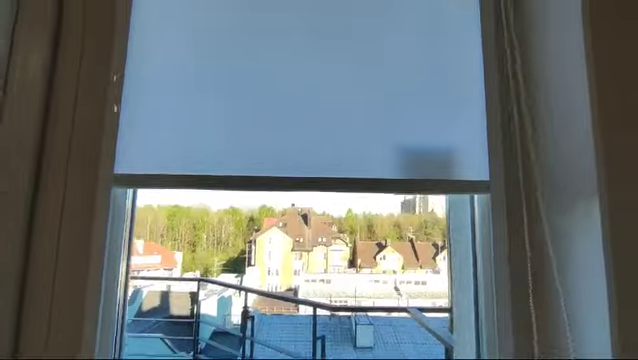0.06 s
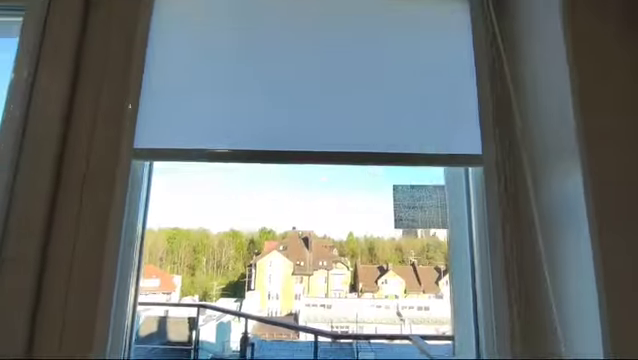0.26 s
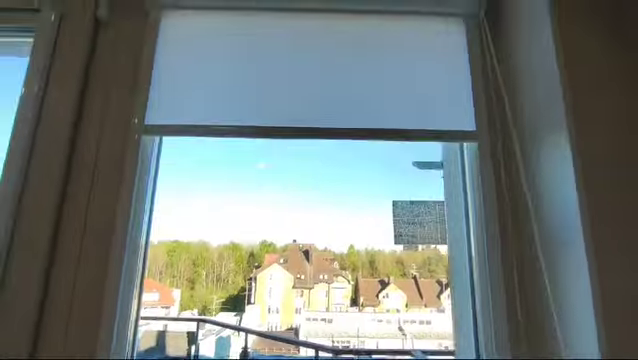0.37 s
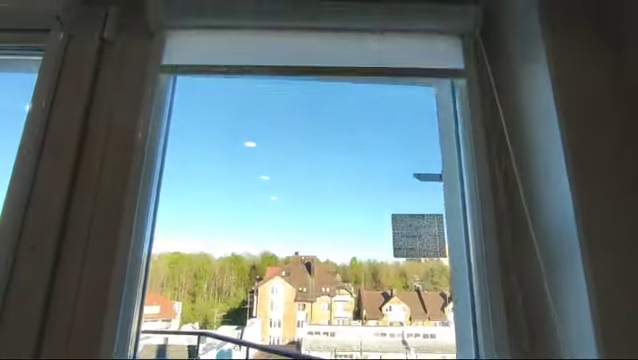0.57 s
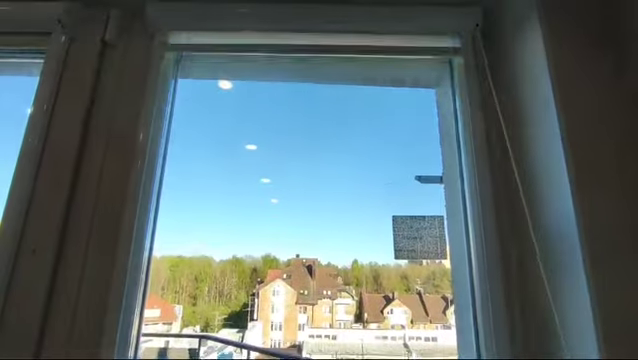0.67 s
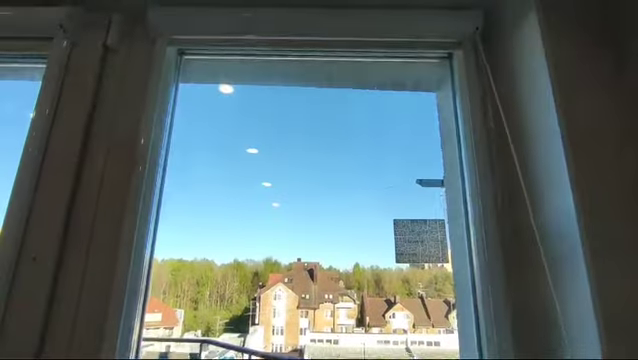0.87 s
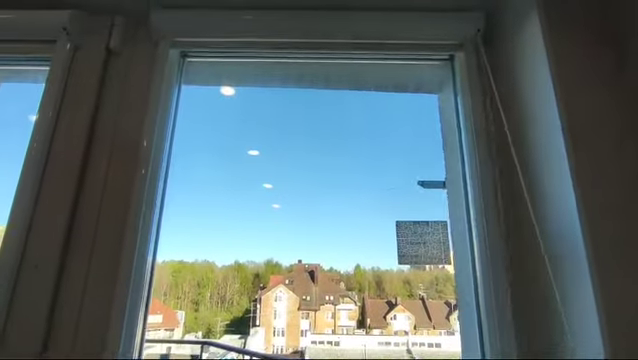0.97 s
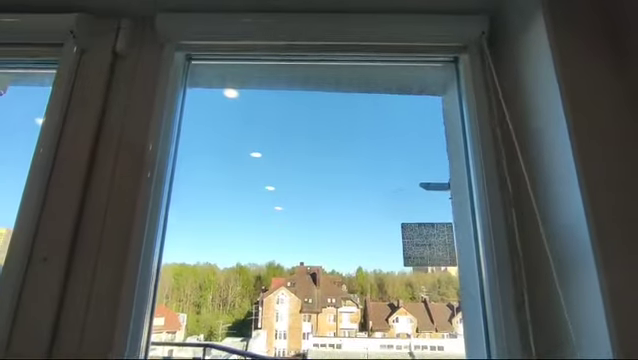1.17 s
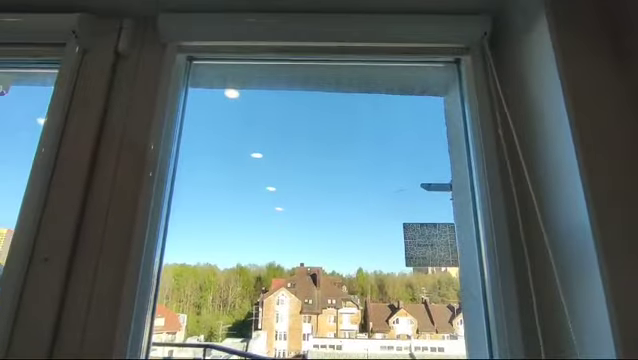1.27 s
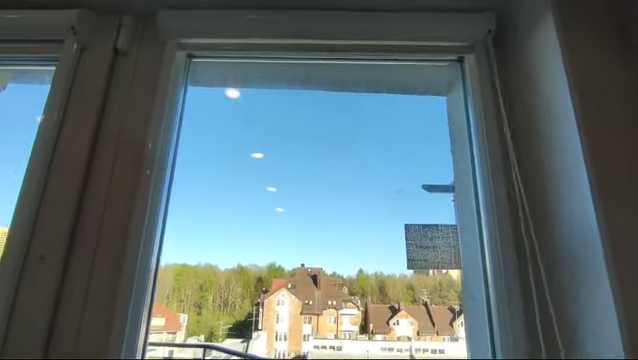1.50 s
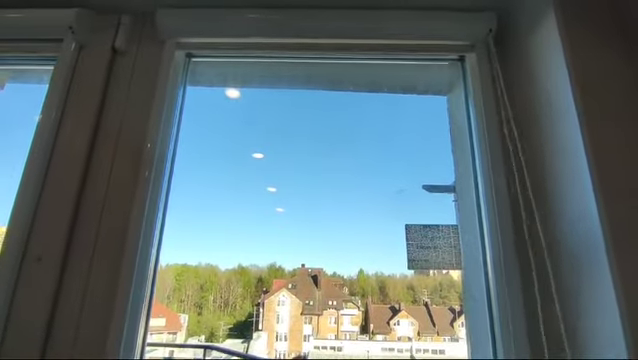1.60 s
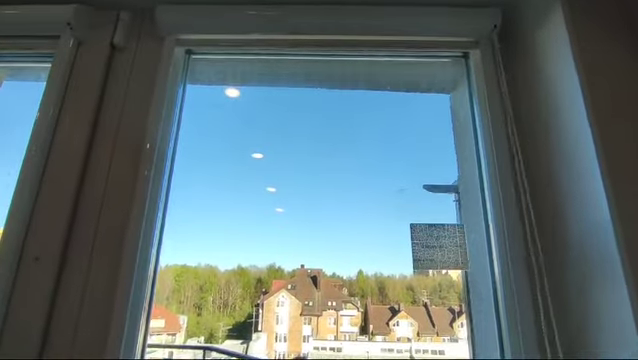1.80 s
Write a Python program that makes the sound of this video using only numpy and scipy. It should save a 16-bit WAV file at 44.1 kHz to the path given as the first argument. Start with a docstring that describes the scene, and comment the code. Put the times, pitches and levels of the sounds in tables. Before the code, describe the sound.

A spring roller blind whirs and ticks rapidly upward, then knocks hard at the top

```python
"""A small, hard-walled room, close to a window; a stereo pair with its right port nearer the window.
A spring roller blind is let go: slips in its bearings make a whirr, sprung ticks and a thin whine join in,
then it slows and the bottom bar knocks the top and rings the frame. A soft rustle and a light cord tap follow.
Most sources are shaped noise, with sines for whine and rings. The left port is dull: treble sits on the right."""
import sys
import numpy as np
from scipy import signal
from scipy.fft import rfft, irfft, next_fast_len
from scipy.io import wavfile
from scipy.ndimage import map_coordinates

SR = 44100
rng = np.random.default_rng(int(sys.argv[2]) if len(sys.argv) > 2 else 0)


def wav_record(signal):
    """Record a signal, one row per channel, as 16-bit PCM in the file named by sys.argv[1]."""
    frames = np.transpose(np.atleast_2d(signal))
    bounded = np.clip(frames, -1, 1)
    # unit amplitude maps onto the largest positive 16-bit level
    quanta = np.round(bounded * 32767).astype(np.int16)
    wavfile.write(sys.argv[1], SR, quanta)


N = 81585  # samples

# Source levels are relative, ahead of the room and the ports; colours are relative too.
# the quiet room's rumble and its air: pitch_hz, level_db
RUMBLE_COLOUR = [(12, -30), (20, 8.5), (66, -7), (97, -16.5), (130, -14), (170, -49), (290, -120),
                 (300, -44), (800, -50.5)]
AIR_COLOUR = [(100, 8.5), (300, 1), (1000, -12), (3000, -13), (8000, -39), (15000, -24.5)]
RUMBLE_DB, AIR_DB = -45.5, -55

# the roller's rubbing: time_s, level_db
RUB_LEVEL = [(0, -65), (.03, -51), (.15, -47), (.21, -47), (.29, -37.5), (.34, -32.5), (.5, -32.5),
             (.58, -33.5), (.66, -36), (.73, -46), (.81, -58)]
# the roller's speed, as the pitch of its whine: time_s, pitch_hz
ROLLER_SPEED = [(0, 300), (.2, 800), (.3, 1030), (.37, 1170), (.46, 1390), (.5, 1340), (.57, 1290),
                (.64, 1150), (.72, 1030), (.81, 900)]
# colour of the rubbing: pitch_hz, level_db
RUB_COLOUR = [(88, -93), (150, -20.5), (209, -21), (481, -24), (656, -5), (930, -10), (1000, -3.5),
              (1290, -5.5), (1700, -3), (2180, -3.5), (2360, -6.5), (6110, -19), (8330, -11.5),
              (10300, -24), (15500, -29.5)]
# resonances of the roller tube: pitch_hz, width_hz, level_db
TUBE_MODES = [(660, 60, -12), (1024, 15, -9), (1546, 18, 0), (1835, 60, -7), (2040, 50, -6), (2120, 22, 0),
              (2540, 110, -7), (3080, 120, -11), (4980, 300, -20)]
STOP_S = 0.74  # the rubbing is cut off here
FULL_SPEED_HZ, SLIPS_PER_S = 1252, 9000  # whine pitch at which the slips come this often
SLIP_SPREAD_DB, RUB_FLUTTER_DB = 2, 2.6
RUB_DB, TUBE_DB = 1, -7

# ticks of the spring mechanism: peak_s, level_db
SPRING_TICKS = [(.016, -48), (.0245, -40), (.059, -51), (.1005, -36), (.148, -36.5), (.182, -29),
                (.2075, -21), (.227, -25.5), (.2455, -23.5), (.261, -30), (.278, -23), (.289, -33),
                (.36, -30), (.374, -30), (.396, -27), (.464, -30)]
# colour of a tick: pitch_hz, level_db
TICK_COLOUR = [(150, -25), (360, -11), (480, -20), (650, -9), (950, -16), (1550, -3), (1800, -5), (2120, 0),
               (2650, -2), (3100, -8), (3800, -20), (5000, -13), (6600, -22), (8400, -16), (10500, -26),
               (15000, -30)]
TICK_RISE_S, TICK_FALL_S = 0.0026, 0.0032
TICK_RING_HZ, TICK_RING_DB = 2125, -1

# clicks of small plastic parts: start_s, level_db, t60_s, ring_db (ring against click)
PLASTIC_CLICKS = [(.0825, -48, 0.015, -20), (.308, -25, 0.084, 1.5), (0.32, -32, 0.054, -10),
                  (.522, -23, 0.013, -16), (0.8803, -31, 0.05, -17), (0.884, -34.5, 0.13, -10),
                  (1.158, -58, 0.021, -9), (1.245, -55, 0.023, -12)]
# colours of the click and of its thin ring: pitch_hz, level_db
CLICK_COLOUR = [(1500, -7), (5500, -9), (6800, -3), (8400, 3), (9500, -4.5), (11500, -11.5), (15500, -12)]
CLICK_RING_COLOUR = [(6000, -49), (7600, -14), (7920, 1), (8300, -20), (10000, -48)]

# swells of the whine as the roll turns: peak_s, length_s, level_db
WHINE_SWELLS = [(.36, .033, -38), (.5, .017, -28.5), (.572, .015, -30.5), (.638, .011, -29.5),
                (.695, .02, -43)]
WHINE_ROUGH = 0.012  # wander, as a share of its pitch

# drone of the nearly full roll: time_s, level_db
DRONE_LEVEL = [(.4, -60), (.62, -54.5), (.74, -46.5), (.81, -49.5), (.84, -97)]
# colour of the drone: pitch_hz, level_db
DRONE_BODY = [(100, -42), (185, -16), (214, -0.5), (250, -10.5), (330, -23), (420, -12), (550, -7),
              (900, -31), (3000, -73)]

# colour of the scrape in the hollow squawk: pitch_hz, level_db
SCRAPE_COLOUR = [(300, -56), (620, -6), (800, -3), (1030, -1.5), (1250, 3.5), (1700, -20.5), (5000, -48)]
SQUAWK_S, SQUAWK_LENGTH_S = 0.4415, 0.0045
SQUAWK_HZ, SQUAWK_HZ_PER_S = 1020, 25000  # pitch at the peak, and its upward slide
SQUAWK_DB, SCRAPE_DB = -20, -5  # the scrape is against the tone

# contacts of the bar at the top: start_s, level_db, t60_s
BAR_KNOCKS = [(.8085, -24, 0.12), (.813, -24.5, 0.084), (.8155, -16.5, 0.072), (.832, -46, 0.17),
              (.875, -24, .08)]
# colour of a contact: pitch_hz, level_db
KNOCK_COLOUR = [(80, -27), (140, -13), (200, 1), (380, -2), (540, 4.5), (800, 1), (1300, 1), (2000, 2),
                (2400, -5), (2800, -3.5), (3800, -13.5), (6000, -19.5), (8400, -15.5), (10500, -26),
                (15500, -29)]
# modes of the struck frame: pitch_hz, level_db, t60_s
FRAME_MODES = [(221, -39, 0.21), (481, -36.5, 0.32), (528, -38.5, 0.54), (606, -41, 0.19),
               (775, -35.5, 0.13), (1056, -45, 0.48), (1150, -43.5, 0.87), (1247, -43, 0.13),
               (1492, -32, 0.23), (1900, -31, 0.29), (1923, -42.5, 0.28), (2782, -24.5, 0.042)]
FRAME_S, FRAME_DB = 0.8135, 4.5  # moment of the ring, and lift of all its modes

# dull shuffle, then low and high rustle: time_s, level_db
SHUFFLE_LEVEL = [(1.28, -80), (1.34, -46), (1.43, -49.5), (1.47, -68)]
LOW_RUSTLE_LEVEL = [(1.61, -74), (1.67, -48.5), (1.72, -50), (1.85, -52.5)]
HIGH_RUSTLE_LEVEL = [(1.73, -79), (1.79, -45.5), (1.825, -43.5), (1.85, -45.5)]
# their colours: pitch_hz, level_db
SHUFFLE_BODY = [(40, 10), (120, -0.5), (230, -6.5), (400, -14), (2000, -60)]
LOW_RUSTLE_COLOUR = [(200, -30), (500, -5.5), (1400, -1), (2200, -8), (4000, -14), (8300, -12),
                     (11000, -21.5), (15000, -26.5)]
HIGH_RUSTLE_COLOUR = [(800, -30), (1800, -5.5), (2600, 4.5), (4200, 3), (6000, -1.5), (8300, -1),
                      (10500, -9.5), (15000, -13)]

# light taps of the swinging cord: start_s, level_db, t60_s
CORD_TAPS = [(1.304, -41, 0.1), (1.3172, -33, 0.08), (1.362, -45.5, 0.18)]
# colour of a tap: pitch_hz, level_db
TAP_COLOUR = [(150, -17), (360, -2.5), (700, -3.5), (1200, 1), (1600, -0.5), (1900, 2), (2700, -2),
              (4000, -13.5), (8000, -22), (10500, -35), (15000, -33)]
# what the last tap rings: pitch_hz, level_db, t60_s
TAP_RING = [(1785, -44, .12), (1900, -45, .3), (2222, -46, .15)]

# decay of the room: pitch_hz, t60_s
ROOM_DECAY = [(150, 0.76), (500, 0.8), (1100, 0.88), (2000, 0.77), (5000, 0.84), (9000, 0.53),
              (15000, 0.37)]
# colour of the room: pitch_hz, level_db
ROOM_TONE = [(150, -7), (280, 3), (500, -1), (750, -3), (1100, 1), (2000, -0.5), (2900, -1.5), (5000, -0.5),
             (12000, 1.5)]
# left-right likeness of the room, and of sources close by: pitch_hz, likeness
ROOM_LIKENESS = [(150, 0.52), (400, 0.87), (900, .15), (2000, 0.056), (15000, 0)]
NEAR_LIKENESS = [(150, 0.48), (500, 0.88), (1100, 0.23), (2000, 0), (4000, 0.37), (15000, 0)]
# extra path to the left port, as the window is nearer the right: pitch_hz, lag_s
LEFT_PORT_LAG = [(200, 0), (1000, .0003)]
ROOM_BUILD_S = 0.0033
ROLLER_WET_DB, WHINE_WET_DB, KNOCK_WET_DB, TAP_WET_DB, SMALL_WET_DB = -3, -9, -3.5, -7, -10.5

# response of each microphone port: pitch_hz, level_db
LEFT_RESPONSE = [(1000, -4.5), (3000, -2), (4200, -5), (5500, -10.5), (8000, -23.5), (8900, -34),
                 (10000, -28), (12000, -6.5), (13500, -5), (15500, -9)]
RIGHT_RESPONSE = [(1000, -4.5), (3000, -3), (5000, -0.5), (8300, 0.5), (12000, -3.5), (15500, 2)]
TOP_HZ = 15830  # band limit


def amp(db):
    """Decibels to amplitude."""
    return 10 ** (np.asarray(db) / 20)


def unit(x):
    """x at an RMS of one."""
    return x / np.sqrt(np.mean(x ** 2) + 1e-20)


def clock():
    """The time of each sample, in seconds."""
    return np.arange(N) / SR


def curve(rows):
    """Straight lines through (time_s, value) points, one value per sample."""
    return np.interp(clock(), *np.transpose(rows))


def along(points, hz):
    """(pitch_hz, value) points read on a log axis."""
    point_hz, values = np.transpose(points)
    return np.interp(np.log(hz + 1), np.log(point_hz + 1), values)


def filtered(x, response):
    """x times a complex response of frequency."""
    length = x.shape[-1]
    padded = next_fast_len(length + SR // 2)
    spectrum = rfft(x, padded) * response(np.fft.rfftfreq(padded, 1 / SR))
    return irfft(spectrum, padded)[..., :length]


def coloured(x, spectrum, size=4096):
    """x through a causal filter of unit energy with this spectrum."""
    cepstrum = irfft(np.log(amp(along(spectrum, np.fft.rfftfreq(size, 1 / SR)))))
    # folding the cepstrum forward gives minimum phase
    cepstrum[1:size // 2] *= 2
    cepstrum[size // 2 + 1:] = 0
    kernel = irfft(np.exp(rfft(cepstrum)))
    kernel = kernel / np.linalg.norm(kernel)
    return signal.fftconvolve(x, kernel[None], axes=1)[:, :N]


def paired(x, alike):
    """Two unrelated signals blended into left and right with a likeness set per frequency."""
    def blend(hz):
        turn = np.arccos(np.clip(along(alike, hz), -1, 1)) / 2
        return np.array([np.cos(turn), np.sin(turn)])

    mid, side = filtered(x, blend)
    return np.array([mid + side, mid - side])


def noise():
    """White stereo noise from a nearby source."""
    return paired(rng.standard_normal((2, N)), NEAR_LIKENESS)


def wobble(rate):
    """A smooth random curve, rate knots a second."""
    return map_coordinates(rng.standard_normal(N // 8), [clock() * rate], mode="mirror")


def decay(start_s, t60):
    """An envelope that jumps up and dies away by 60 dB in t60 seconds."""
    age = clock() - start_s
    return (age >= 0) * amp(-60 * np.abs(age) / t60)


def burst(peak_s, rise, fall):
    """An envelope that swells to a point and falls."""
    age = clock() - peak_s
    return np.exp(-np.abs(age) / np.where(age < 0, rise, fall))


def swell(peak_s, length):
    """A rounded, bell-shaped envelope."""
    return np.exp(-((clock() - peak_s) / length) ** 2 / 2)


def blows(rows, spectrum):
    """Short rattling contacts, as dying noise through one body colour."""
    level = sum(amp(db) * decay(start_s, t60) for start_s, db, t60 in rows)
    return coloured(noise() * level, spectrum)


def ring(start_s, modes):
    """Dying sines struck together; the higher ones reach the ports out of step."""
    skews = rng.standard_normal((len(modes), 2, 1))
    total = 0
    for (hz, db, t60), skew in zip(modes, skews):
        phase = 2 * np.pi * hz * (clock() - start_s) + skew * (1 - along(ROOM_LIKENESS, hz))
        total = total + amp(db) * decay(start_s, t60) * np.sin(phase)
    return total


def room(x, wet_db):
    """The direct sound, later on the left, and a tail in which each frequency dies at its own speed."""
    hz, t, z = signal.stft(paired(rng.standard_normal((2, SR)), ROOM_LIKENESS), SR, nperseg=256)
    fade_db = along(ROOM_TONE, hz)[:, None] - 60 * t / along(ROOM_DECAY, hz)[:, None]
    build = 1 - np.exp(-t / ROOM_BUILD_S)
    tail = signal.istft(z * amp(fade_db) * build, SR, nperseg=256)[1]
    tail = tail / np.linalg.norm(tail[0])

    def lag(f):
        # half the lag delays the left, half advances the right
        return np.exp(-1j * np.pi * f * along(LEFT_PORT_LAG, f) * np.array([[1], [-1]]))

    direct = filtered(x, lag)
    wet = signal.fftconvolve(x[:1], tail, axes=1)[:, :N]  # the left channel feeds the tail
    return direct + amp(wet_db) * wet


def background():
    """Low rumble, a little stronger on the left, and faint air, both steady shaped noise."""
    rumble = paired(rng.standard_normal((2, N)), [(50, 0.16)])
    rumble = unit(filtered(rumble, lambda hz: amp(along(RUMBLE_COLOUR, hz))))
    rumble = rumble * amp([[1.5], [-1.5]])  # dB, left and right
    return amp(RUMBLE_DB) * rumble + amp(AIR_DB) * coloured(noise(), AIR_COLOUR)


def tube(hz):
    """Response of the roller tube: resonances side by side, alternating in sign."""
    total = 0
    for k, (centre, width, db) in enumerate(TUBE_MODES):
        damping = 1j * hz * width
        total = total + (-1) ** k * amp(db) * damping / (centre ** 2 - hz ** 2 + damping)
    return total


def whirr():
    """Tiny slips in the bearings, denser with speed, rub and ring the tube."""
    chance = SLIPS_PER_S * curve(ROLLER_SPEED) / FULL_SPEED_HZ / SR
    slips = rng.random(N) < chance
    sizes = amp(SLIP_SPREAD_DB * rng.standard_normal(N))
    signs = np.sign(rng.standard_normal((2, N)))
    grains = unit(paired(slips * sizes * signs, NEAR_LIKENESS))
    level = amp(curve(RUB_LEVEL) + RUB_FLUTTER_DB * wobble(110.7))
    drive = grains * level * (clock() < STOP_S)
    rubbing = coloured(drive, RUB_COLOUR)
    ringing = filtered(drive, tube) / filtered(grains, tube).std()
    return amp(RUB_DB) * rubbing + amp(TUBE_DB) * ringing


def ticks():
    """Each tick is a brief scrape that rings the roller's main resonance."""
    level = sum(amp(db) * burst(peak_s, TICK_RISE_S, TICK_FALL_S) for peak_s, db in SPRING_TICKS)
    opposed = np.array([[np.pi], [0]])  # half a cycle apart here; the left port's later path brings the tone nearly into step
    tone = np.sin(2 * np.pi * TICK_RING_HZ * clock() + wobble(157.9) + opposed)
    scrape = coloured(level * noise(), TICK_COLOUR)
    return (scrape + amp(TICK_RING_DB) * level * tone) * amp([[-1], [1]])  # dB, left and right


def clicks():
    """Hard little snaps of dying noise, each with a thin narrow-band ring of its own strength."""
    snap = sum(amp(db) * decay(start_s, t60) for start_s, db, t60, ring_db in PLASTIC_CLICKS)
    ringing = sum(amp(db + ring_db) * decay(start_s, t60) for start_s, db, t60, ring_db in PLASTIC_CLICKS)
    return coloured(noise() * snap, CLICK_COLOUR) + coloured(noise() * ringing, CLICK_RING_COLOUR)


def whine():
    """A thin, slightly rough tone follows the speed and swells as the roll turns."""
    pitch_hz = curve(ROLLER_SPEED) * (1 + WHINE_ROUGH * wobble(300))
    phase = 2 * np.pi * np.cumsum(pitch_hz) / SR
    level = sum(amp(db) * swell(peak_s, length) for peak_s, length, db in WHINE_SWELLS)
    return level * np.sin(phase + np.array([[np.pi / 2], [0]]))  # left a quarter cycle ahead


def drone():
    """The roll hums as the last of the cloth winds on: noise in low resonances."""
    return amp(curve(DRONE_LEVEL)) * coloured(noise(), DRONE_BODY)


def squawk():
    """The rising cloth catches: a few hollow, scraping cycles that slide upward in pitch."""
    age = clock() - SQUAWK_S
    cycles = (SQUAWK_HZ + SQUAWK_HZ_PER_S * age / 2) * age
    tone = np.sin(2 * np.pi * cycles + np.array([[np.pi / 2], [0]]))
    scrape = amp(SCRAPE_DB) * coloured(noise(), SCRAPE_COLOUR)
    return amp(SQUAWK_DB) * swell(SQUAWK_S, SQUAWK_LENGTH_S) * (tone + scrape)


def knock():
    """The bar hits the top in a quick cluster of contacts and rings the frame."""
    return blows(BAR_KNOCKS, KNOCK_COLOUR) + amp(FRAME_DB) * ring(FRAME_S, FRAME_MODES)


def rustle():
    """A dull shuffle, then a soft sliding noise that turns brighter."""
    layers = [(SHUFFLE_LEVEL, SHUFFLE_BODY),
              (LOW_RUSTLE_LEVEL, LOW_RUSTLE_COLOUR),
              (HIGH_RUSTLE_LEVEL, HIGH_RUSTLE_COLOUR)]
    return sum(coloured(noise() * amp(curve(level) + 1.2 * wobble(90)), colour)  # 1.2 dB of flutter
               for level, colour in layers)


def tap():
    """The cord swings against the frame; its last contact leaves a short ring."""
    last_s = CORD_TAPS[-1][0]
    contact = blows(CORD_TAPS, TAP_COLOUR) + ring(last_s, TAP_RING)
    return contact * amp([[1.5], [-1.5]])  # dB, left and right


def scene():
    """Each group of sources in the room at its own wetness, over the background."""
    roller = room(whirr() + ticks() + squawk() + drone(), ROLLER_WET_DB) + room(whine(), WHINE_WET_DB)
    small = room(clicks() + rustle(), SMALL_WET_DB)
    return roller + small + room(knock(), KNOCK_WET_DB) + room(tap(), TAP_WET_DB) + background()


def record(dry):
    """Each port has its own colour; nothing is kept above the band limit."""
    def ports(hz):
        return amp([along(LEFT_RESPONSE, hz), along(RIGHT_RESPONSE, hz)]) * (hz < TOP_HZ)

    return filtered(dry, ports)


dry = scene()
out = record(dry)
wav_record(out)
```